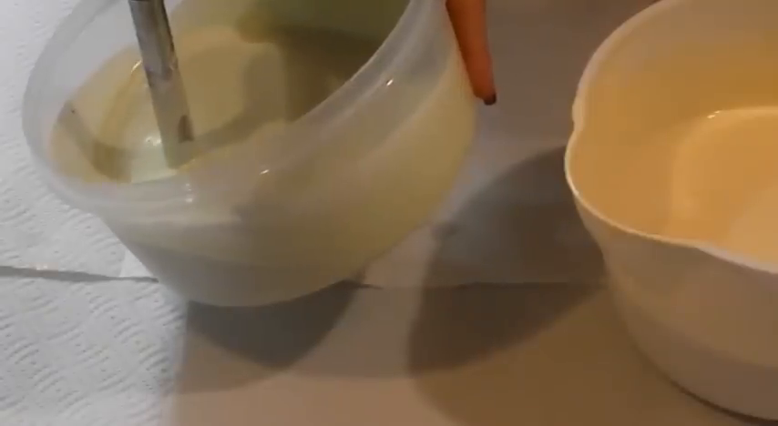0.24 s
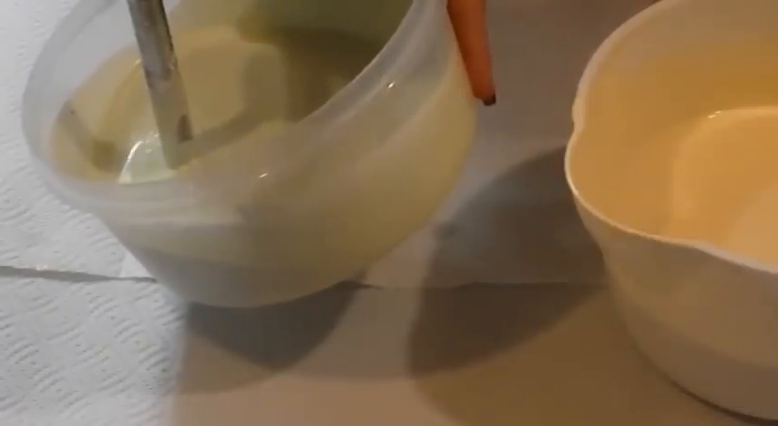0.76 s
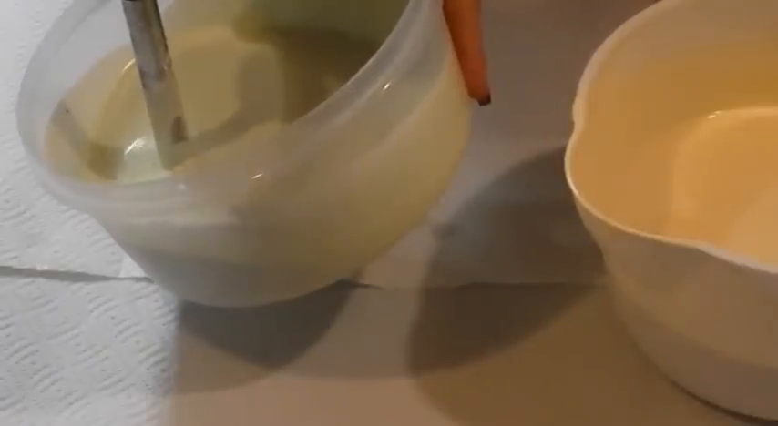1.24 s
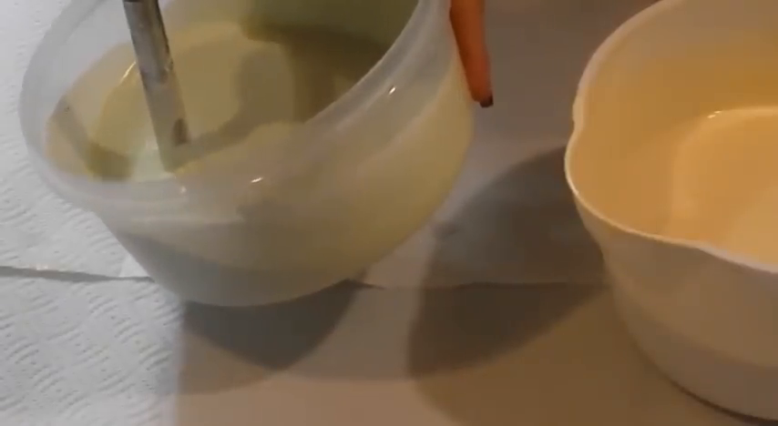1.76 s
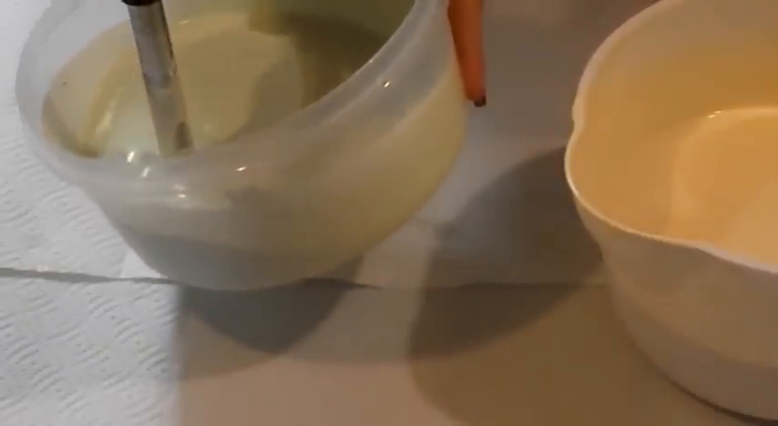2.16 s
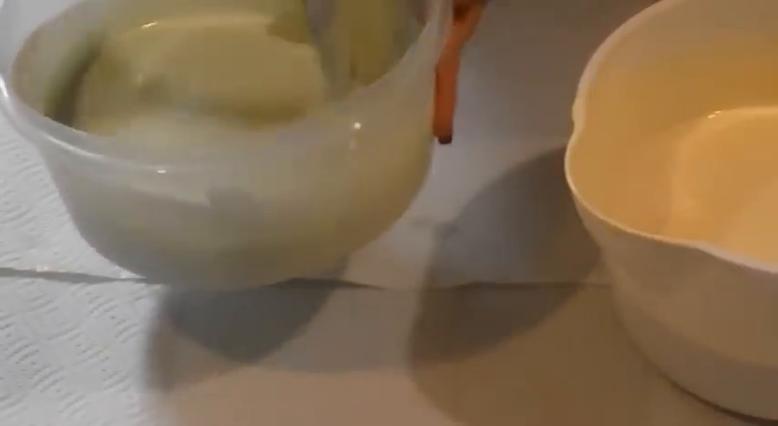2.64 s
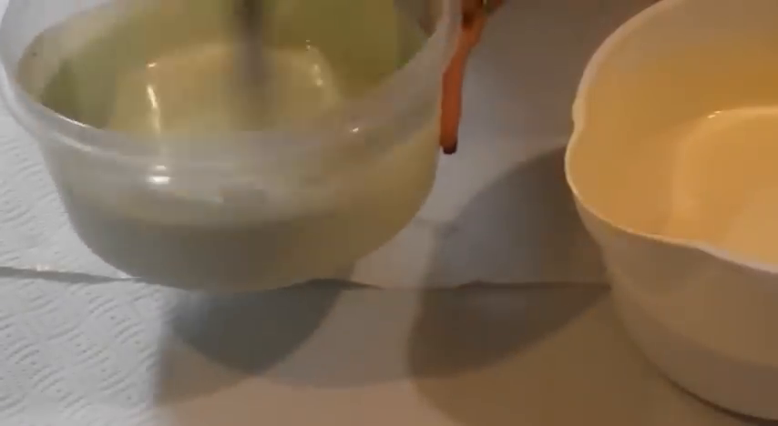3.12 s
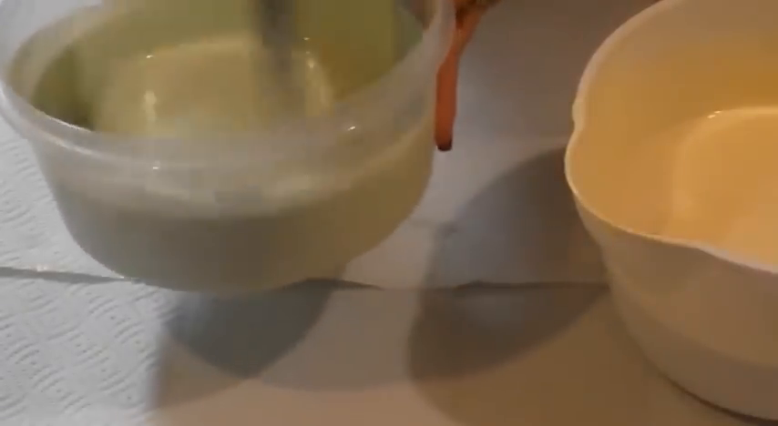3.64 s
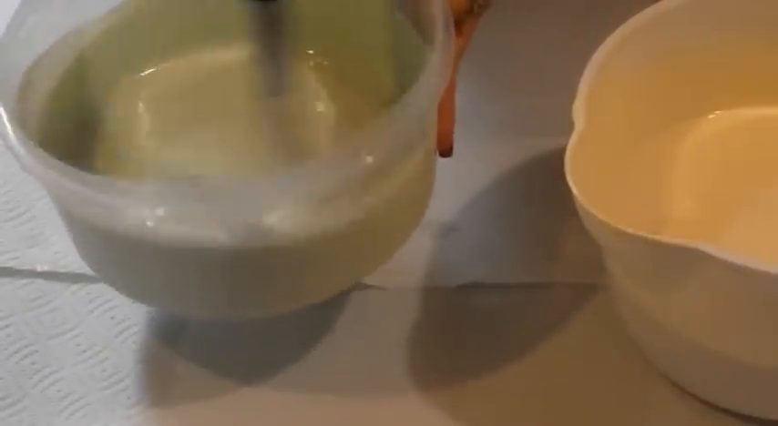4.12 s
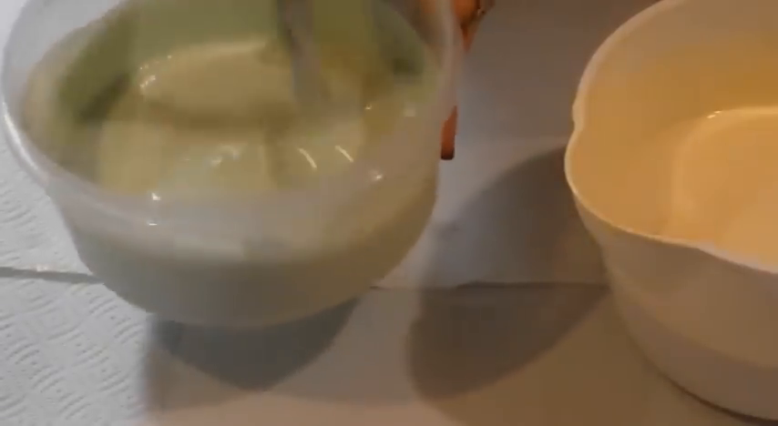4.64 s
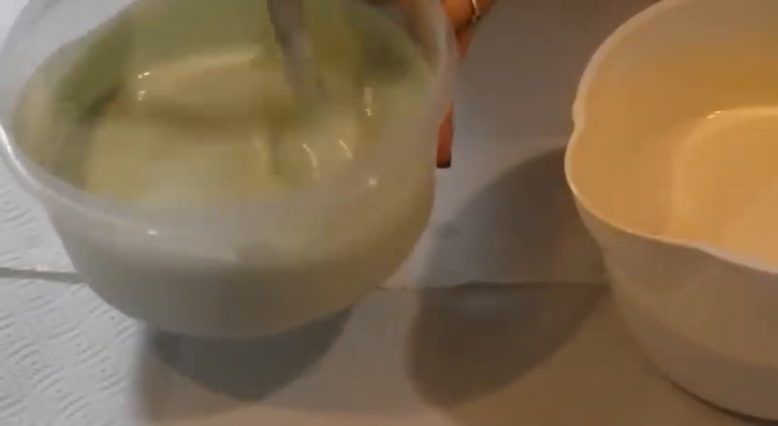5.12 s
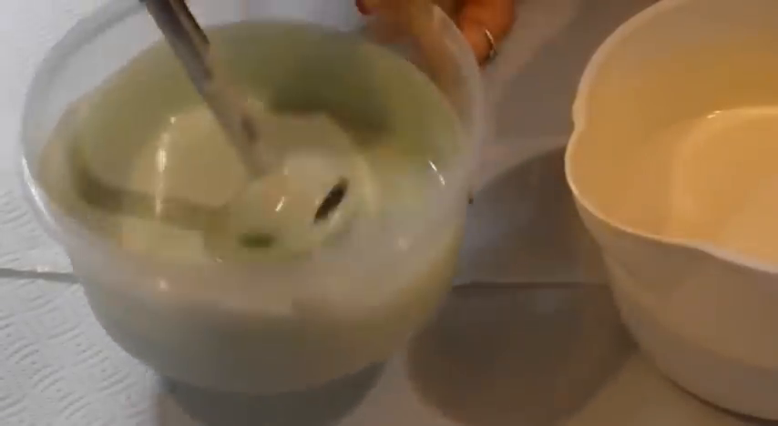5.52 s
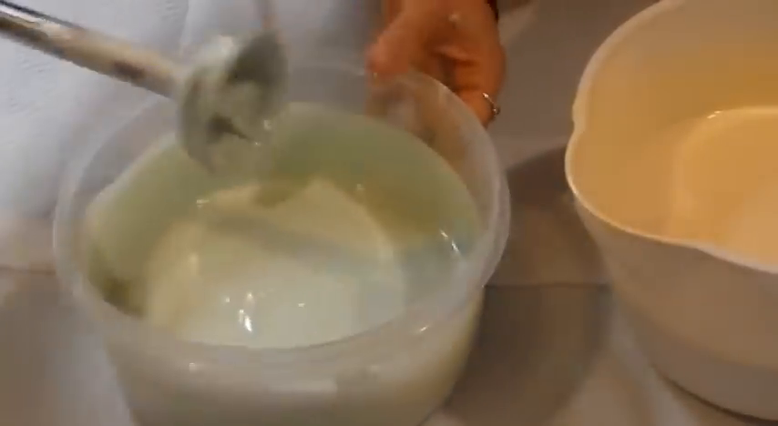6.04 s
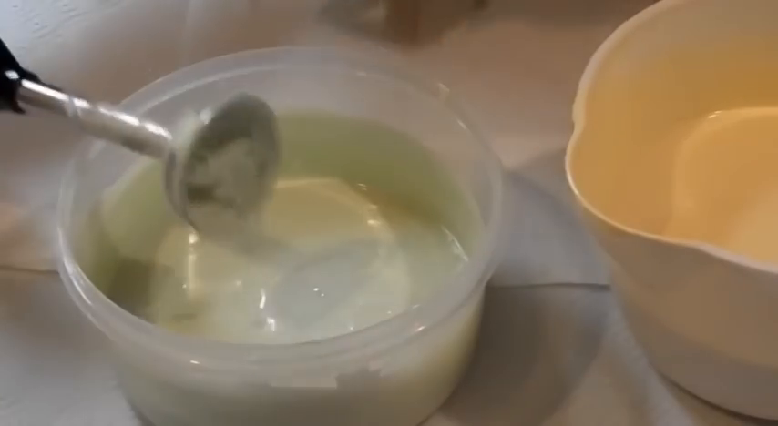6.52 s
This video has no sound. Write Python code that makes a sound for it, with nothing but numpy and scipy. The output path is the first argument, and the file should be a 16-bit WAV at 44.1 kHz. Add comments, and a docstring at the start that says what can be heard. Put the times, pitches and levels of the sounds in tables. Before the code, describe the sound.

Close by in a quiet kitchen, a hand blender hums and buzzes as it whisks liquid into a froth. The motor soon cuts out and winds down with a few small wet slaps. A string of light, uneven taps follows as the steel head stirs and touches the plastic tub. Near the end come a few tiny ticks and two louder clacking knocks as the tub is set on the table.

```python
"""A stick blender whisks thin liquid in a plastic tub: the spinning shaft hums, the blade tears the
liquid into a frothy wash, and the motor's brushes hiss, buzz and squeal. Switched off, it coasts
down with a rasp. The idle head stirs, taps the tub wall and is lifted out with a few small ticks.
The tub bumps lightly on the table and lands with two knocks, its wall clacking over a low boom."""
import sys
import numpy as np
from scipy import signal
from scipy.fft import rfft, irfft, next_fast_len
from scipy.io import wavfile
from scipy.ndimage import uniform_filter1d, minimum_filter1d

SR = 44100
rng = np.random.default_rng(int(sys.argv[2]) if len(sys.argv) > 2 else 0)


def unload_wav(signal):
    """Save mono or channel-first audio to the path in sys.argv[1] as 16-bit WAV at rate SR, clipped to [-1, 1]."""
    wavfile.write(
        sys.argv[1],
        SR,
        np.round(np.clip(np.atleast_2d(signal).T, -1, 1) * 32767).astype(np.int16),
    )


N = 299290
TIME = np.arange(N) / SR
SWITCH_OFF_S, MAINS_HZ, CUTOFF_HZ = 1.982, 60, 15800
SEGMENTS = 24   # around the commutator
TEAR_SPEED = 98.4   # turns/s; below this the blade lets go of the liquid


def from_db(db):
    """Decibels to gain."""
    return 10 ** (np.asarray(db) / 20)


def rms_one(x):
    """Scale to unit power."""
    return x / np.sqrt(np.mean(x ** 2) + 1e-20)


def noise(size=N):
    """White noise."""
    return rng.standard_normal(size)


def cut(x, hz, kind, order=2):
    """Butterworth filter."""
    sections = signal.butter(order, np.clip(hz, 5, .48 * SR), kind, fs=SR, output="sos")
    return signal.sosfilt(sections, x + 1e-18)


def drift(hz):
    """Random wander below hz, at unit power."""
    return rms_one(cut(noise(N + SR), hz, "low")[SR:])


def gain_at(curve, hz):
    """Gain of an EQ curve, read on a log axis."""
    points, db = np.transpose(curve)
    return from_db(np.interp(np.log(hz + 1e-3), np.log(points), db))


def coloured(x, curve):
    """Shape a sound with an EQ curve; unit power."""
    size = next_fast_len(N)
    gain = gain_at(curve, np.arange(size // 2 + 1) * SR / size)
    return rms_one(irfft(rfft(x, size) * gain, size)[:N])


def resonate(x, hz, width_hz):
    """A resonance with gain 1 at its peak."""
    r = np.exp(-np.pi * width_hz / SR)
    feedback = [1, -2 * r * np.cos(2 * np.pi * hz / SR), r * r]
    return signal.lfilter(np.array([1, 0, -1]) * (1 - r * r) / 2, feedback, x)


def held(start_s, end_s, fade_s):
    """An envelope that rises, holds and falls."""
    return np.clip(np.minimum(TIME - start_s, end_s - TIME) / fade_s, 0, 1)


def swells(rows):
    """Smooth rises and dips of a level, in dB."""
    return sum(db * np.exp(-((TIME - s) / half_s) ** 2) for s, half_s, db in rows)


def with_speed(speed, db_per_octave):
    """Gain that falls with every halving of the shaft speed; 1 at full speed."""
    return from_db(db_per_octave * np.log2(speed / speed.max() + 1e-6))


def dying(t60, size=22050):
    """A decay that loses 60 dB in t60 seconds."""
    return from_db(-60 * TIME[:size] / t60)


def struck(modes, vary_db, size=22050):
    """A blow sets each mode ringing with a strength of its own; peak 1."""
    out = 0
    for k, (hz, db, t60) in enumerate(modes):
        strength = (-1) ** k * from_db(db + vary_db * rng.normal())
        out = out + strength * dying(t60, size) * np.sin(2 * np.pi * hz * TIME[:size])
    return out / np.abs(out).max()


def crack(low_hz, high_hz, t60):
    """A short burst of contact noise, starting near unit power."""
    decay = dying(t60)
    burst = cut(cut(noise(len(decay)) * decay, low_hz, "high"), high_hz, "low")
    return burst * np.sqrt(np.sum(decay ** 2) / np.sum(burst ** 2))


def ping(hz, spread, t60):
    """A brief burst that rings around one pitch."""
    band = [hz / (1 + spread), hz * (1 + spread)]
    return cut(crack(*band, t60), band, "band")


def add(out, s, sound):
    """Mix a sound in at a time."""
    at = int(s * SR)
    out[at:at + len(sound)] += sound[:N - at]


def room_tone(level_db=-51.5):
    """A bed of faint air and low rumble."""
    # colour of the room's air: f/Hz, level/dB
    air_eq = [(12, 5), (25, -6), (38, -20.5), (70, -28), (146, -39), (300, -45), (1400, -49.5), (4400, -53),
              (8000, -54.5), (15000, -56)]
    return from_db(level_db) * coloured(cut(noise(), 16, "high"), air_eq)


def kitchen(x, t60=0.093, wet_db=-15.5, wall_hz=6000, build_s=0.023):
    """Close walls return a short, slightly dull tail."""
    decay = dying(t60)
    tail = cut(noise(len(decay)), wall_hz, "low") * decay
    tail *= np.clip(TIME[:len(tail)] / build_s, 0, 1)
    return x + from_db(wet_db) * signal.fftconvolve(x, tail / np.linalg.norm(tail))[:N]


def rumble_and_slosh(speed, rest_db=-70, handling_db=-67, stir_db=-72.5):
    """Low rumble of the hand-held blender while it runs, and a dull slosh when the hand stirs."""
    handling = from_db(handling_db) * speed / speed.max()
    stirring = from_db(stir_db) * held(3.7, 5.32, fade_s=0.27)
    return (from_db(rest_db) + handling + stirring) * rms_one(cut(noise(), [22, 75], "band"))


def plops_and_ticks(tick_trim_db=-5.0):
    """Liquid slaps and tiny ticks; the narrower a tick's band, the longer it rings."""
    # last slaps of the slowing blade, then small plops: t/s, level/dB, f/Hz
    plops = [(2.267, -21, 1340), (2.299, -16, 1420), (2.32, -20, 1470), (2.37, -28, 1300),
             (2.385, -31, 1340), (4.17, -42, 616), (4.252, -44.5, 1350)]
    # ticks of plastic and drops: t/s, level/dB, f/Hz, relative width
    ticks = [(.148, -18, 4500, 0.069), (2.715, -32.5, 2860, 0.13), (3.014, -49, 8600, 0.11),
             (3.208, -46, 12800, 0.19), (4.343, -42, 3350, .1), (4.668, -44, 7350, 0.084),
             (4.766, -38, 8750, .07), (5.772, -29.5, 8300, 0.073), (5.916, -35.5, 5660, 0.53),
             (6.353, -30, 7730, 0.036), (6.528, -21, 10400, 0.47), (6.558, -32.5, 11600, 0.18),
             (6.702, -36, 9000, 0.31)]
    out = np.zeros(N)
    for s, db, hz in plops:
        add(out, s, from_db(db) * ping(hz, spread=.2, t60=.025))
    for s, db, hz, width in ticks:
        add(out, s, from_db(db + tick_trim_db) * ping(hz, width, t60=.008 / np.sqrt(width)))
    return out


def taps(ring_db=-0.5, crack_db=-6.5, thud_db=7.0, edge_db=8.0, attack_s=0.0036, firm_hz=7000):
    """The steel head hits the plastic wall: a crack, a ring and a thud; glancing taps are duller."""
    # head against the wall: t/s, wall level/dB, thud level/dB, edge level/dB
    hits = [(2.955, -28, -81, -83), (3.171, -35, -65, -45.5), (3.497, -23, -53.5, -37.5),
            (3.975, -25, -54.5, -44.5), (4.4, -19.5, -41.5, -26.5), (4.861, -18, -42.5, -30.5),
            (5.158, -21, -41.5, -47.5), (6.21, -40, -83, -24.5)]
    # modes of the tub wall: f/Hz, level/dB, t60/s
    wall_modes = [(595, 4.5, 0.11), (806, 22, 0.041), (1070, -25, 0.049), (1403, 19, 0.07),
                  (1550, 12, 0.02), (1987, 13, 0.017), (2420, -43, 0.026), (3330, -32.5, .04),
                  (4123, 25, 0.01)]
    out = np.zeros(N)
    for s, level, thud, edge in hits:
        top_hz = firm_hz * from_db(min(edge - level, 0) / 4)
        wall = from_db(ring_db) * struck(wall_modes, vary_db=3.5)
        wall += from_db(crack_db) * crack(530, 1980, t60=0.05)
        wall = from_db(level) * cut(cut(wall, 360, "high"), top_hz, "low", order=3)
        snap = from_db(edge + edge_db) * cut(crack(2700, 7000, t60=0.012), 2 * top_hz, "low", order=6)
        tap = wall + snap + from_db(thud + thud_db) * crack(134, 153, t60=0.092)
        add(out, s - .001, tap * np.clip(TIME[:len(tap)] / attack_s, 0, 1))
    return out


def knocks(ring_db=-0.5, crack_db=-2.5, body_db=-14.0, edge_db=-8.0, boom_lag_s=0.0031):
    """The tub lands: its wall clacks and the table top booms."""
    # tub on the table: t/s, clack level/dB, boom level/dB
    landings = [(5.807, -77, -30), (5.982, -78, -43), (6.052, -80, -41.5), (6.447, -13.5, -15),
                (6.546, -80, -24.5), (6.715, -8, -10.5)]
    # modes of the tub's base: f/Hz, level/dB, t60/s
    base_modes = [(224, 0, .2), (357, -17, 0.23), (419, -5, 0.16), (555, -2.5, 0.13), (669, 0.5, 0.07),
                  (945, -6, 0.083), (1066, -10, 0.053), (1340, -6, 0.12), (2030, -1.5, 0.017)]
    # modes of the table top: f/Hz, level/dB, t60/s
    table_modes = [(56.76, 3, 0.5), (140, -6.5, 0.24), (177.3, -15.5, 0.38), (218, -23, 0.09),
                   (310, -44, 0.061)]
    out = np.zeros(N)
    for s, clack, boom in landings:
        wall = from_db(ring_db) * struck(base_modes, vary_db=0.5)
        wall += from_db(crack_db) * crack(330, 1580, t60=0.019)
        wall += from_db(body_db) * crack(114, 870, t60=0.16)
        wall += from_db(edge_db) * crack(4200, 4200, t60=0.019)
        add(out, s, from_db(clack) * wall)
        add(out, s + boom_lag_s, -from_db(boom) * struck(table_modes, vary_db=4.5))
    return out


def shaft(wobble_rad=0.0083, dry_friction=111, viscous_drag=.6, blade_drag=.0087):
    """Speed, turns and mains ripple: pulses nudge the powered shaft, then friction and drag stop it."""
    # under power, a little faster once the liquid moves: t/s, speed/(turns/s)
    run_speed = [(0, 184.2), (.25, 184.6), (.42, 186.4), (.9, 186.0), (1.7, 186.7)]
    running = np.interp(TIME, *np.transpose(run_speed))
    falling = np.linspace(running[-1], 0, 2000)
    braking = dry_friction + viscous_drag * falling + blade_drag * falling ** 2   # turns/s lost each s
    elapsed = np.cumsum((falling[0] - falling[1]) / braking)
    speed = np.where(TIME < SWITCH_OFF_S, running, np.interp(TIME - SWITCH_OFF_S, elapsed, falling))
    mains = np.cos(2 * np.pi * MAINS_HZ * TIME) * np.clip((SWITCH_OFF_S - TIME) * MAINS_HZ, 0, 1)
    turns = np.cumsum(speed) / SR + wobble_rad * mains / (2 * np.pi)
    return speed, turns, mains


def rasp(speed, turns, grip=0.53, rotor_db=-53.5, loudest_speed=32, scrape_db=-70):
    """Friction rings the steel shaft: the rotor rasps at low speed, then a scrape as stirring begins."""
    # resonances of shaft and coupling: f/Hz, width/Hz, level/dB
    steel_modes = [(1600, 83, -9), (2513, 120, -5.5), (2995, 81, 4), (3410, 80, 3.5), (4640, 110, 2),
                   (5200, 280, 5.5), (6800, 380, -1.5), (8570, 250, 0.5), (9800, 1000, -8)]
    segment_ripple = grip * np.minimum(speed / 10, 1) * np.cos(2 * np.pi * SEGMENTS * turns)
    friction = noise() * (1 + segment_ripple)
    rings = sum(from_db(db) * resonate(friction, hz, width) for hz, width, db in steel_modes)
    pace = speed / loudest_speed
    rotor = from_db(rotor_db) * pace * np.exp((1 - pace ** 2) / 2)
    scrape = from_db(scrape_db) * held(2.87, 3.25, fade_s=0.061)
    return (rotor + scrape) * rms_one(rings)


def gurgles():
    """Pockets of air ring briefly as the blade swallows them."""
    # gulps of air: t/s, level/dB, f/Hz
    gulps = [(.41, -22, 2290), (0.537, -20, 2385), (0.655, -22, 2310)]
    out = np.zeros(N)
    for s, db, hz in gulps:
        add(out, s, from_db(db) * ping(hz, spread=.04, t60=.25))
    return out


def brushes(speed, turns, hiss_db=-42, run_buzz_db=-69.5, coast_buzz_db=-43, flare_db=4.0):
    """Brushes hiss and click over the commutator; the buzz sweeps through the housing's resonances."""
    # colour of motor air and brush friction: f/Hz, level/dB
    hiss_eq = [(300, -0.5), (2500, 1), (4000, -3.5), (5000, -5.5), (5600, -6.5), (7000, -11), (10200, -18),
               (12000, -21.5), (13400, -15), (14500, -30), (16000, -36)]
    # how the housing radiates the buzz: f/Hz, level/dB
    housing_eq = [(1500, -13), (3000, -16), (4100, -15.5), (5200, 1), (6300, -2.5), (7500, -0.5),
                  (9400, 4.5), (10700, -6), (11900, 10.5), (12800, -1.5), (13900, 5), (14700, -7),
                  (15500, -1)]
    # commutator partials: multiple of the segment rate, level/dB
    partials = [(1, -14.5), (2, -17), (3, -4), (4, -5), (5, -4.5), (6, -1), (7, -5), (10, 1)]
    coasting = held(SWITCH_OFF_S, np.inf, fade_s=.02)
    hiss_level = from_db(hiss_db) * with_speed(speed, db_per_octave=8.5)
    buzz_db = run_buzz_db + (coast_buzz_db - run_buzz_db) * coasting
    buzz_level = from_db(buzz_db) * with_speed(speed, db_per_octave=5)
    rattle_rad = .06 + 0.28 * speed / speed.max()
    angle = 2 * np.pi * SEGMENTS * turns + rattle_rad * drift(150)
    edge_hz = 4000 + 70 * speed   # the clicks soften as the rotor slows
    buzz = 0
    for k in range(1, 11):
        hz = k * SEGMENTS * speed
        in_band = np.clip((CUTOFF_HZ - hz) / 500 + 1, 0, 1)
        flicker = from_db((1 + flare_db * coasting) * drift(60))
        softened = 1 / np.sqrt(1 + (hz / edge_hz) ** 8)
        gain = in_band * flicker * softened * gain_at(housing_eq, hz) * gain_at(partials, k)
        buzz = buzz + gain * np.sin(k * angle + rng.uniform(0, 2 * np.pi))
    each_turn = 1 + 0.14 * np.cos(2 * np.pi * turns)
    return hiss_level * coloured(noise() * each_turn, hiss_eq) + buzz_level * buzz * each_turn


def squeal(pitch_hz=8989, level_db=-34.5, swing_hz=75, wander_hz=7, scatter_rad=0.32, rough_db=3.0):
    """A brush sings at its own pitch, swelling and bending at the mains rate; it dies after switch-off."""
    pulse = np.cos(2 * np.pi * MAINS_HZ * TIME + 1.49)
    hz = pitch_hz + swing_hz * pulse + wander_hz * drift(4.5)
    angle = 2 * np.pi * np.cumsum(hz) / SR + scatter_rad * drift(63)
    tone = rms_one((1 + 0.5 * pulse) * from_db(rough_db * drift(160)) * np.sin(angle))
    fade_db = 8 * np.minimum(TIME / SWITCH_OFF_S, 1) ** 2
    release_db = 12 * held(SWITCH_OFF_S, np.inf, fade_s=0.053) + 46 * np.maximum(TIME - SWITCH_OFF_S, 0)
    return from_db(level_db - fade_db - release_db) * tone


def hum(speed, turns, mains, level_db=-12, sag_db_per_s=1.61, throb=0.05, radiation_hz=125):
    """Shaft unbalance and two blade tips drone; torque pulses add a throb, and coasting a burble."""
    # hum partials: multiple of the shaft rate, level/dB
    partials = [(1, -5), (2, 3.5), (3, -5.5), (4, 4), (5, -25.5), (6, -9), (7, -16.5), (8, -13.5), (9, -25),
                (10, -30.5)]
    # a dead spot and two resonances of the handle: f/Hz, half width/Hz, level/dB
    handle = [(152.9, 12, -11), (326, 26, 8), (418, 22, 9.5)]
    # the blade-tip tone, partial 2, dips once: t/s, half length/s, level/dB
    tip_dips = [(1.915, .1, -13)]
    level = from_db(level_db - sag_db_per_s * TIME) * with_speed(speed, db_per_octave=22)
    level *= np.minimum(speed / TEAR_SPEED, 1) ** 3
    rough_rad = 0.032 + .6 * (1 - speed / speed.max())
    angle = 2 * np.pi * turns + rough_rad * drift(29)
    waver_db = 0.55 + 6.5 * rough_rad
    out = 0
    for k, db in partials:
        handle_db = sum(peak * np.exp(-((k * speed - hz) / width) ** 2) for hz, width, peak in handle)
        gain = from_db(db + handle_db + (k == 2) * swells(tip_dips) + waver_db * drift(18))
        out = out + gain * np.sin(k * angle + rng.uniform(0, 2 * np.pi))
    # the small handle radiates deep tones poorly
    out = cut(out * (1 + throb * mains), radiation_hz, "high", order=3)
    return level * out / np.std(out[TIME < SWITCH_OFF_S])


def froth(wash, clear_hz=2345, froth_hz=1533, settle_s=0.75):
    """Whisked-in air swallows the treble: the top edge slides down through crossfaded low-passes."""
    edges = np.geomspace(1200, 3000, 7)
    edge_hz = froth_hz + (clear_hz - froth_hz) * np.exp(-TIME / settle_s)
    fader = np.interp(edge_hz, edges, np.arange(len(edges)))
    out = 0
    for k, hz in enumerate(edges):
        dulled = signal.sosfiltfilt(signal.butter(7, hz, fs=SR, output="sos"), wash)
        out = out + np.maximum(1 - abs(fader - k), 0) * dulled
    return cut(out, 2550, "low", order=14)


def churn(speed, turns, wash_db=-7.5, sag_db_per_s=2.15, guard_db=-23.5, chop=0.54):
    """Each turn of the blade tears the liquid; the wash sags as it froths, and the blade guard rings."""
    # colour of the blade's wash: f/Hz, level/dB
    wash_eq = [(60, -40), (200, -36), (270, -26), (330, -10.5), (480, -9), (600, -7), (680, -3),
               (900, -1.5), (1100, -8), (1500, -6), (2000, -5.5), (2600, -2)]
    # resonances of the filled tub: f/Hz, width/Hz, level/dB
    tub_modes = [(678.7, 33, -2.5), (712, 7.3, -6.5), (807, 23, -1.5), (1032.5, 43, 0), (1661, 47, 4.5),
                 (2310, 220, 4.5)]
    # resonances of the submerged guard: f/Hz, width/Hz, level/dB
    guard_modes = [(1300, 43, 10.5), (1325, 100, 13)]
    # the guard's ring swells and sinks: t/s, half length/s, level/dB
    guard_swells = [(1.1, 0.1, 4), (1.4, 0.095, 6.5), (1.76, 0.068, -5), (1.89, 0.045, 4),
                    (1.985, 0.018, -7.5)]
    passes = (1 + chop * np.cos(2 * np.pi * turns)) * from_db(0.5 * drift(50))
    tearing = noise() * passes
    tub = sum(from_db(db + 2.5 * drift(24)) * resonate(tearing, hz, width) for hz, width, db in tub_modes)
    wash = froth(coloured(tearing + tub, wash_eq))
    wash_level = from_db(wash_db - sag_db_per_s * TIME) * with_speed(speed, db_per_octave=21.5)
    guard = sum(from_db(db) * resonate(noise() * passes, hz, width) for hz, width, db in guard_modes)
    guard = rms_one(cut(guard, [1050, 1600], "band", order=3))
    guard_level = from_db(guard_db + swells(guard_swells)) * with_speed(speed, db_per_octave=8.5)
    guard_level *= np.minimum(speed / TEAR_SPEED, 1) ** 10
    return wash_level * wash + guard_level * guard


def scene():
    """Mono mix: the blender dry, the contacts with a short tail, rumble, slosh and room tone beneath."""
    speed, turns, mains = shaft()
    blender = hum(speed, turns, mains) + churn(speed, turns) + brushes(speed, turns)
    blender = blender + squeal() + rasp(speed, turns) + gurgles()
    contacts = kitchen(taps() + knocks() + plops_and_ticks())
    return (blender + contacts + room_tone() + rumble_and_slosh(speed))[None]


def record(dry, ceiling=.82):
    """A smooth limiter holds the peaks down; the top is cut steeply."""
    gain = minimum_filter1d(np.minimum(1, ceiling / (np.abs(dry) + 1e-9)), size=441)
    gain = uniform_filter1d(uniform_filter1d(gain, size=221), size=221)
    return signal.sosfilt(signal.ellip(10, .1, 80, CUTOFF_HZ, fs=SR, output="sos"), dry * gain)


dry = scene()
out = record(dry)
unload_wav(out)
```